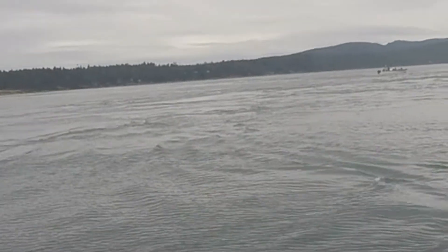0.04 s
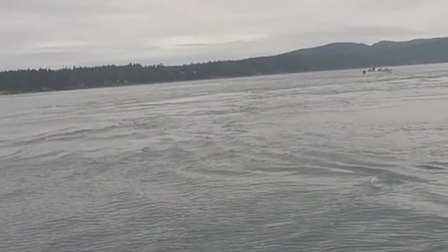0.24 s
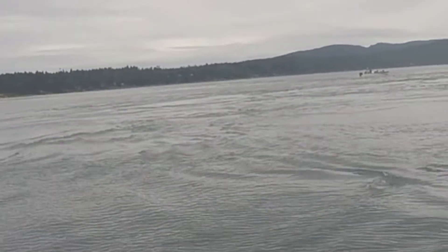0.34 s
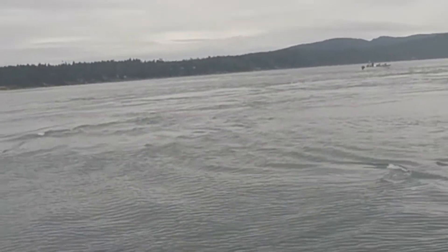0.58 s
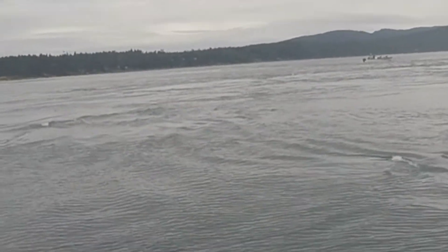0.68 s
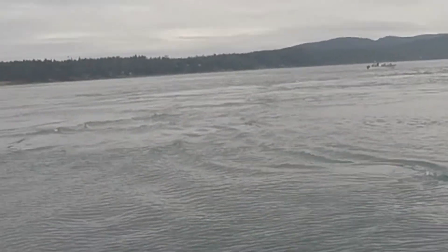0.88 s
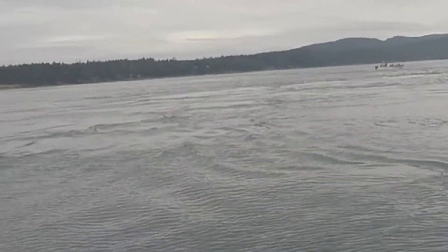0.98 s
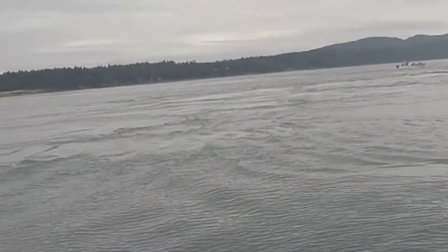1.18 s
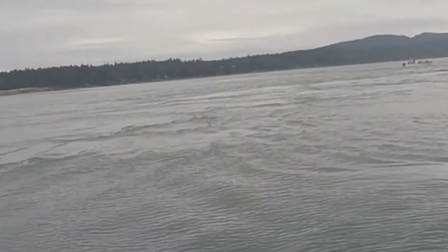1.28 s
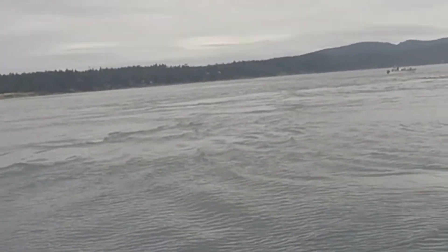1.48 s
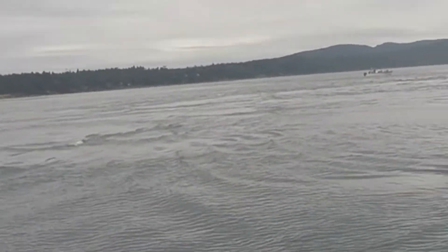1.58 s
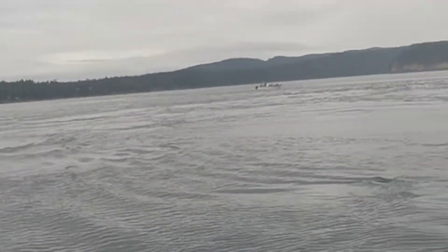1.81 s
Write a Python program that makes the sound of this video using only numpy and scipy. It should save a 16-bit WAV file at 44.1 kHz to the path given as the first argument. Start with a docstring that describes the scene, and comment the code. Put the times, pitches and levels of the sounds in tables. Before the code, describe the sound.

One low knock with a tiny rattle sounds on a boat near the start. Wind rumbles on the microphone throughout, making it sputter in short buzzes and ticks, over a soft wash of open water.

```python
"""A knock on a boat in the wind

One low knock on a boat in open water: a hard contact, the weight behind it, and a brief rattle.
Wind rumbles on the microphone and makes it sputter in short buzzes, ticks and fizzes.
Underneath are a soft wash of water and a faint, very high whine."""
import sys
import numpy as np
from scipy import signal
from scipy.fft import rfft, irfft
from scipy.io import wavfile

SR = 44100
rng = np.random.default_rng(int(sys.argv[2]) if len(sys.argv) > 2 else 0)


def unload_audio(sound):
    """Save the sound as a 16-bit wav file, at the path given as the first command line argument."""
    columns = np.transpose(np.atleast_2d(sound))
    # keep every value between -1 and 1, then stretch to whole-number steps
    steps = np.round(np.clip(columns, -1, 1) * 32767)
    wavfile.write(sys.argv[1], SR, steps.astype(np.int16))


N = 81585

# The wind's sputters. Each row: start in seconds, length in seconds, rough pulse rate in Hz,
# relative buzz level in dB, relative fizz level in dB.
SPUTTERS = [(0.039, 0.032, 262.2, -1.5, -2.5), (0.139, 0.015, 875, 0.5, -1), (0.185, 0.015, 424.5, 3.5, 1),
            (0.235, 0.0068, 497, 1.5, 5), (0.258, .011, 705, -1, 3), (.286, .022, 326, -1.5, 2.5),
            (.337, 0.022, 457, -0.5, 1), (0.404, 0.025, 403.7, -1.5, 0.5), (0.45, 0.018, 463, -8, -5),
            (0.482, 0.02, 600, -4.5, 0), (0.517, 0.023, 1304, -10, 0.5), (.576, 0.012, 654, -1, -5),
            (0.612, 0.016, 680, 1, 1), (0.646, 0.014, 929, 0, 0), (0.679, 0.02, 805, -7.5, -8),
            (.719, 0.015, 1446, 0.5, 4), (0.758, 0.012, 810, 0, 2.5), (0.793, 0.013, 779, 1.5, 3.5),
            (0.813, 0.0054, 870, 1, -7), (.837, 0.0086, 657, -1, 2), (0.867, 0.012, 649, 0, 2),
            (0.913, 0.022, 406, -2.5, 0), (0.959, 0.0227, 373.6, -1.5, -1), (1, .015, 837, -1.5, 1.5),
            (1.04, 0.016, 363, -1, 3), (1.079, 0.015, 428, -2, 2.5), (1.108, 0.018, 500, -10, 2.5),
            (1.14, 0.025, 396, -5.5, 3.5), (1.191, 0.018, 402, -8, 4), (1.241, 0.0068, 393, -8, 1),
            (1.275, 0.022, 301, -1, 4.5), (1.328, 0.019, 334, -1.5, 3.5), (1.363, 0.0344, 387.4, -8.5, -2),
            (1.436, .045, 400, -13, -2.5), (1.508, 0.061, 410, -21, -3.5), (1.586, 0.014, 398, -7.5, 2),
            (1.631, 0.022, 397, -7.5, 1), (1.698, 0.039, 386, -12, 0), (1.778, 0.013, 405, -9, -2.5)]
EDGE_HZ = 3000  # ticks and buzzes are dulled above this


def undb(db):
    """Turn decibels into a number to multiply by."""
    return 10 ** (np.asarray(db) / 20)


def clock():
    """The time of every sample, in seconds."""
    return np.arange(N) / SR


def curve(rows):
    """A volume that glides between (seconds, dB) points."""
    return undb(np.interp(clock(), *np.array(rows).T))


def colour(sound, points):
    """Shape a sound's bass and treble along (Hz, dB) points, then set its average strength to 1."""
    hz, db = np.array(points).T
    freqs = np.maximum(np.fft.rfftfreq(N, 1 / SR), 1)
    gain = undb(np.interp(np.log(freqs), np.log(hz), db))
    shaped = irfft(rfft(sound) * gain, N)
    return shaped / shaped.std()


def band(hz, width):
    """Noise around one pitch, evened out to a strength of 1."""
    freqs = np.fft.fftfreq(N, 1 / SR)
    shape = np.exp(-((freqs - hz) / width) ** 2)
    noise = np.fft.ifft(np.fft.fft(rng.standard_normal(N)) * shape)
    even = np.exp(1j * np.angle(noise))
    narrow = np.fft.ifft(np.fft.fft(even) * shape ** .5).real
    return narrow / narrow.std()


def soften(sound, hz):
    """Gently turn down everything above hz."""
    return signal.sosfilt(signal.butter(2, hz, fs=SR, output="sos"), sound)


def gate(start, length, fade):
    """Fade in, stay on for a while, fade out."""
    t = clock()
    return np.clip(np.minimum(t - start, start + length - t) / fade + .5, 0, 1)


def wind():
    """Wind on the microphone makes a low rumble with a few stronger gusts."""
    # Each row: middle in seconds, width in seconds, pitch in Hz, level in dB.
    gust_rows = [(.075, 0.012, 55, -34), (0.744, .016, 55.7, -41), (0.964, 0.011, 47.6, -37),
                 (1.443, 0.037, 86, -37.5), (1.43, 0.038, 162.9, -51), (1.56, 0.026, 188.7, -53.5)]
    # The rumble's tone. Each row: frequency in Hz, relative level in dB.
    tone = [(15, -21), (30, 2), (45, -2), (65, -2.5), (100, -13.5), (200, -21), (400, -47), (1000, -61)]
    # The rumble's volume. Each row: time in seconds, level in dB.
    levels = [(0, -45.5), (.55, -47), (.85, -43.5), (1.0, -47), (1.3, -46), (1.5, -45.5), (1.85, -43.5)]
    t = clock()
    gusts = sum(undb(db) * np.exp(-((t - at) / width) ** 2) * band(hz, width=12.5)
                for at, width, hz, db in gust_rows)
    return curve(levels) * colour(rng.standard_normal(N), tone) + gusts


def water():
    """Water makes a soft wash of noise whose volume wavers at random."""
    # The wash's tone. Each row: frequency in Hz, relative level in dB.
    tone = [(60, -3), (200, 0.5), (450, -2.5), (1000, -9), (2000, -14.5), (4000, -22), (8000, -35),
            (15000, -47)]
    # Its volume before the wavering. Each row: time in seconds, level in dB.
    levels = [(0, -53), (.8, -54.5), (1.3, -53.5), (1.85, -56)]
    wander = signal.resample(rng.standard_normal(70), N)
    waver_db = 2 * wander / wander.std()
    return curve(levels) * undb(waver_db) * colour(rng.standard_normal(N), tone)


def whine():
    """A faint, steady, very high tone."""
    hz, average_db = 14626, -87
    return undb(average_db) * np.sqrt(2) * np.sin(2 * np.pi * hz * clock())


def fizzes():
    """Fine crackle swells just before each buzz and lingers faintly in between."""
    # The crackle's tone. Each row: frequency in Hz, relative level in dB.
    tone = [(200, -13), (700, -5), (2000, 1.5), (4500, -2), (8000, -8.5), (12000, -17), (15000, -25.5)]
    # Its volume between sputters. Each row: time in seconds, level in dB.
    rest_levels = [(0, -65.5), (.8, -67), (1.3, -64), (1.5, -65.5), (1.85, -67)]
    lead_s, fade_s, base_db, grains_per_s = .006, 0.0019, -58, 3200
    swell = 0
    for at, length, _, buzz_db, fizz_db in SPUTTERS:
        dip_depth = np.clip(0.36 * undb(buzz_db), 0, 1)  # a stronger buzz pushes the fizz down more
        dip = 1 - dip_depth * gate(at, 2 * length, fade_s)
        swell += undb(fizz_db) * dip * gate(at - lead_s, length + lead_s, fade_s)
    grains = np.tanh(2 * rng.standard_normal(N)) * (rng.random(N) < grains_per_s / SR)
    volume = np.hypot(undb(base_db) * swell, curve(rest_levels))
    return volume * colour(grains, tone)


def ticks():
    """Small, sudden drops in pressure lead into many of the sputters and die away at once."""
    # Each row: time in seconds, relative level in dB.
    tick_rows = [(0.0334, -3), (.174, -2), (0.326, -0.5), (0.3902, -5), (0.6051, -1), (0.642, -2),
                 (.7835, -1), (0.8106, 2), (.829, 4.5), (0.861, -1), (0.902, 4.5), (.992, 3.5), (1.033, -2),
                 (1.1035, 1), (1.1393, -4.5), (1.179, -0.5), (1.228, -2), (1.264, 2), (1.3171, -1),
                 (1.619, -2.5)]
    base_db, decay_s = -35, 0.0014
    drops = np.zeros(N)
    for at, db in tick_rows:
        drops[int(at * SR)] = -undb(base_db + db)
    pressure = signal.lfilter([1], [1, -np.exp(-1 / (decay_s * SR))], drops)
    return soften(pressure, EDGE_HZ)


def buzzes():
    """In each sputter the microphone buzzes: a run of equally tall pulses, uneven and slowing down."""
    base_db, pulse_s, scatter_hz, slowing = -38, 0.00037, 90, .25
    pulses = np.zeros(N)
    for at, length, hz, buzz_db, _ in SPUTTERS:
        gap_jitter, width_jitter = rng.standard_normal(size=(64, 2)).T
        beats = np.cumsum(np.exp(scatter_hz / hz * gap_jitter)) / hz
        beats -= beats[0]
        beats *= 1 + slowing * (beats / length - 1) / 2
        for beat, jitter in zip(beats[beats < length], width_jitter):
            width_s = min(pulse_s, 0.24 / hz) * np.exp(0.39 * jitter)
            first = int((at + beat) * SR)
            pulses[first:first + int(width_s * SR)] += undb(base_db + buzz_db)
    deep_bass = soften(pulses, hz=40)
    return soften(pulses - deep_bass, EDGE_HZ)


def knock():
    """A hard contact and a soft, heavy rebound make the boat ring."""
    # The pushes on the boat. Each row: middle in seconds, length in seconds, strength in dB,
    # direction as 1 or -1.
    pushes = [(0.2038, .0003, -23, -1), (.204, .0019, 0, -1), (0.2079, 0.0054, 6, 1)]
    # The boat's own notes. Each row: pitch in Hz, relative level in dB, seconds to fade by 60 dB.
    notes = [(45, -11.5, 0.35), (52.6, -14, 0.17), (167, -35.5, 0.17), (194, -13.5, .1), (321, -17, 0.06),
             (388, -28, 0.083), (561, -18, 0.03), (592, -17.5, 0.059), (660, -17.5, 0.053),
             (843, -13, 0.042), (1152, -14, 0.059), (1570, -14.5, 0.073), (1630, -15.5, 0.095),
             (2590, -21.5, 0.081)]
    t, force = clock(), 0
    for at, length, db, direction in pushes:
        push = np.cos(np.pi * np.clip((t - at) / length, -.5, .5)) ** 2
        force += direction * undb(db) * push / push.sum()
    ring = sum(undb(db) * np.sin(2 * np.pi * hz * t) * np.exp(-np.log(1000) * t / fade_s)
               for hz, db, fade_s in notes)
    thud = signal.fftconvolve(force, ring)[:N]
    low_cut = signal.butter(2, 21.5, "high", fs=SR, output="sos")
    return signal.sosfilt(low_cut, thud)


def rattle():
    """Something loose rattles with the knock, in three tiny bursts of noise."""
    # Each row: start in seconds, length in seconds, pitch in Hz, pitch spread in Hz, level in dB.
    bursts = [(0.2049, .006, 1630, 1370, -36), (0.2065, 0.0025, 4000, 1530, -51.5),
              (0.2117, 0.0024, 2320, 260, -29.5)]
    return sum(undb(db) * gate(at, length, fade=0.0019) * band(hz, width)
               for at, length, hz, width, db in bursts)


def scene():
    """Add all the sounds together in one channel."""
    return (knock() + rattle() + wind() + buzzes() + fizzes() + ticks() + water() + whine())[None]


def record(dry):
    """Cut away the very highest treble."""
    top_hz = 15200
    return signal.sosfilt(signal.ellip(8, .2, 70, top_hz, fs=SR, output="sos"), dry)


dry = scene()
out = record(dry)
unload_audio(out)
```